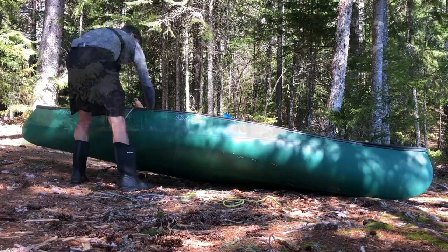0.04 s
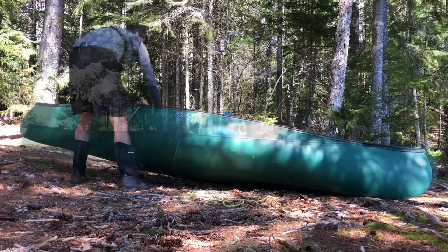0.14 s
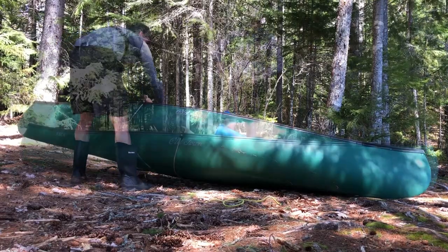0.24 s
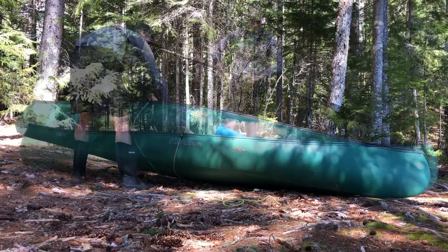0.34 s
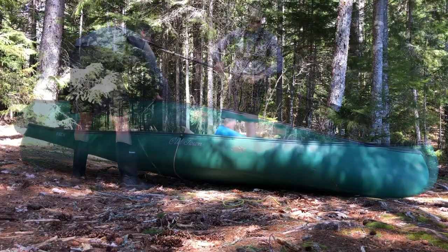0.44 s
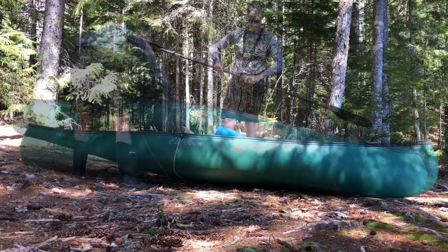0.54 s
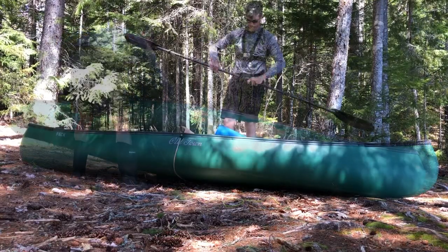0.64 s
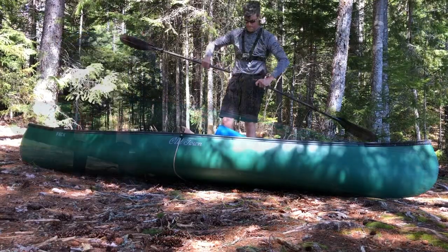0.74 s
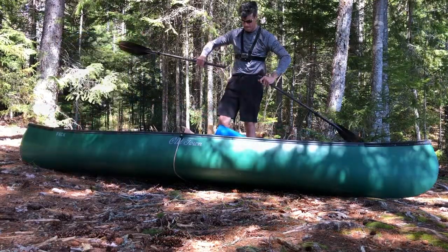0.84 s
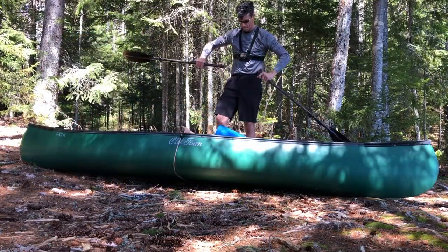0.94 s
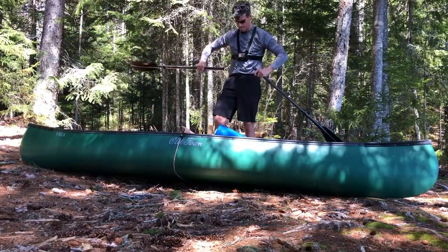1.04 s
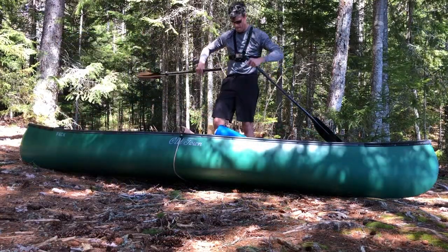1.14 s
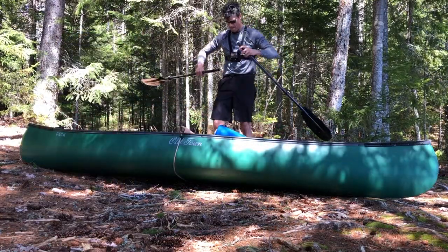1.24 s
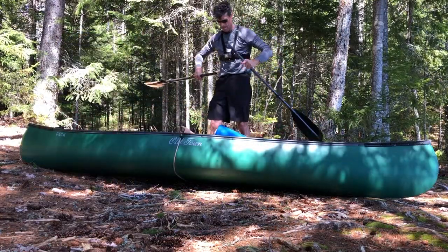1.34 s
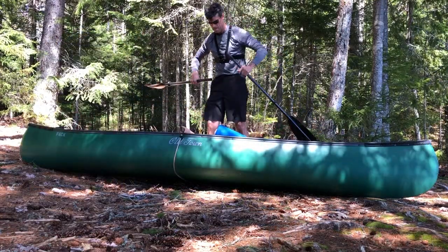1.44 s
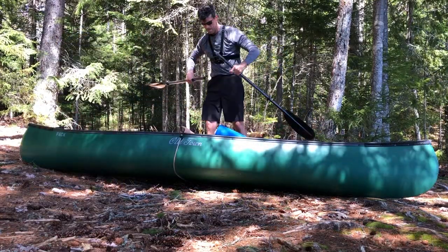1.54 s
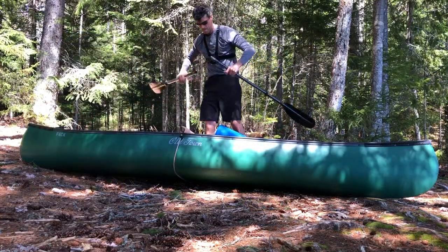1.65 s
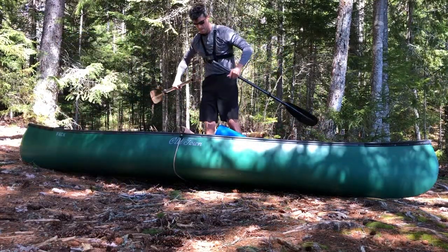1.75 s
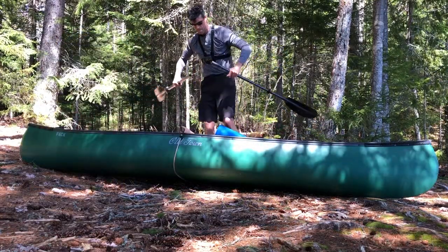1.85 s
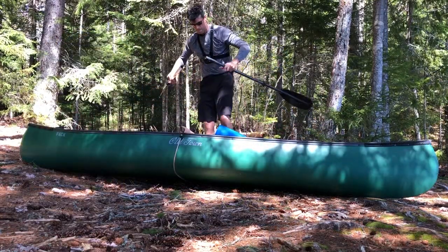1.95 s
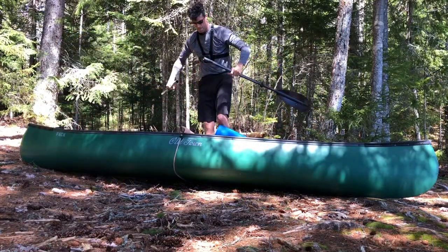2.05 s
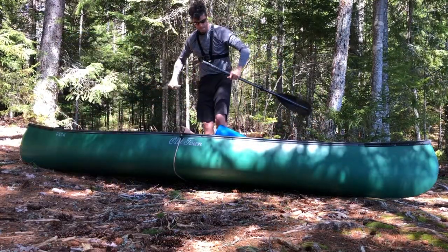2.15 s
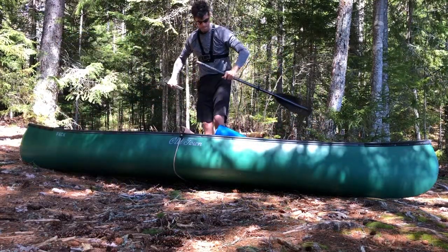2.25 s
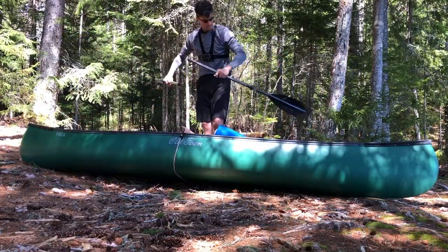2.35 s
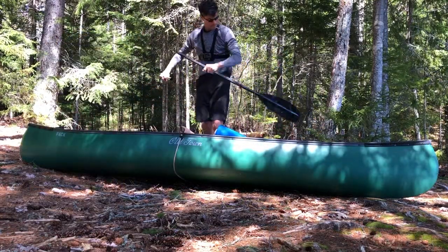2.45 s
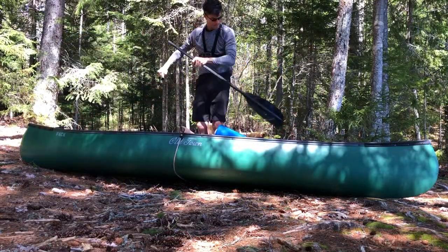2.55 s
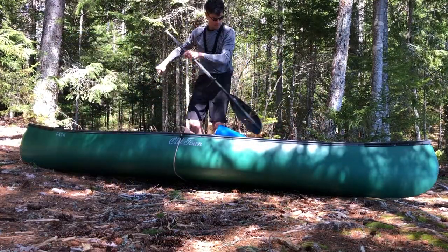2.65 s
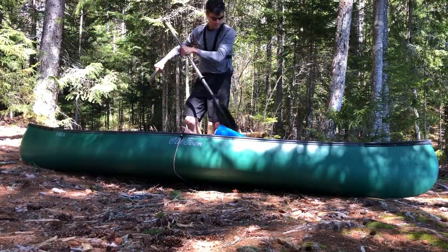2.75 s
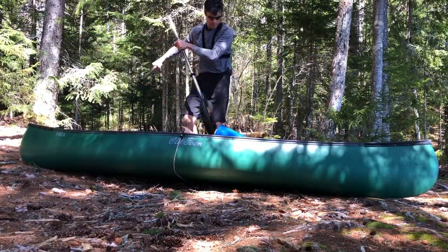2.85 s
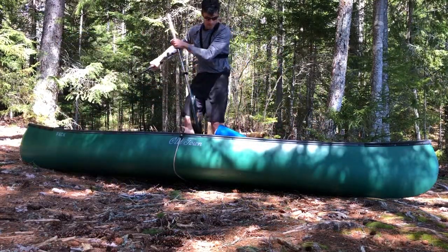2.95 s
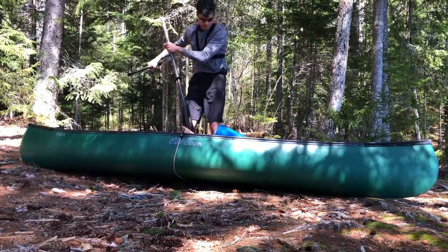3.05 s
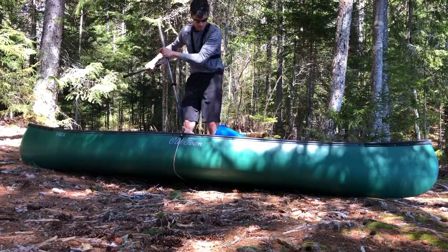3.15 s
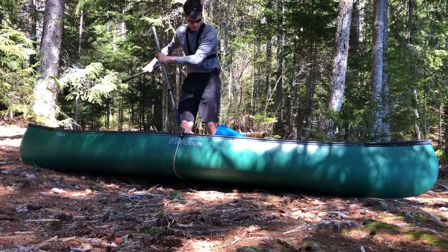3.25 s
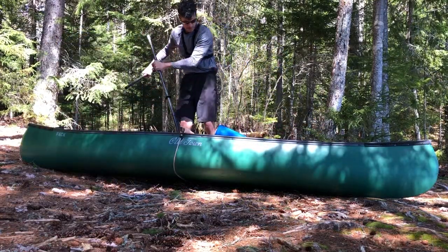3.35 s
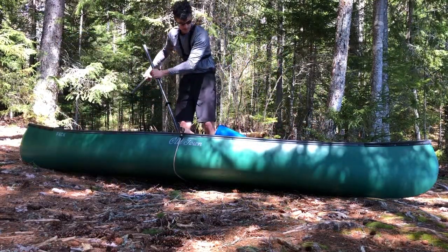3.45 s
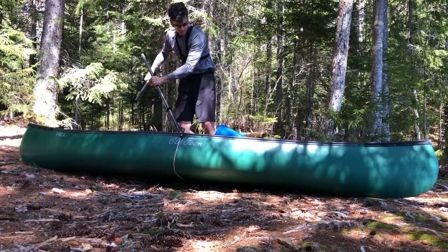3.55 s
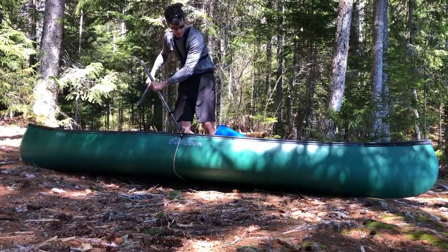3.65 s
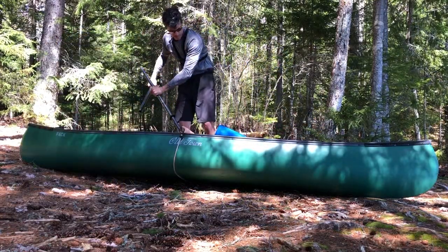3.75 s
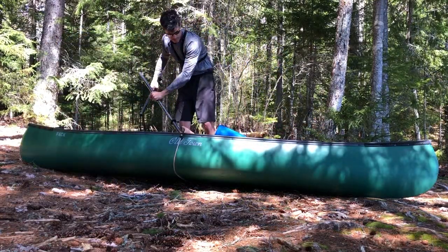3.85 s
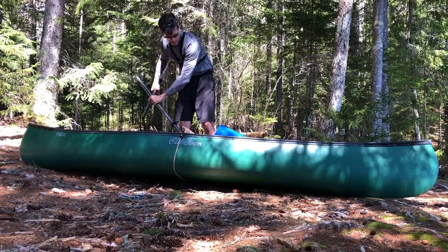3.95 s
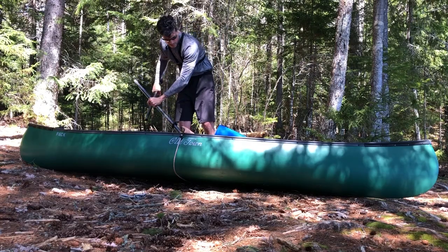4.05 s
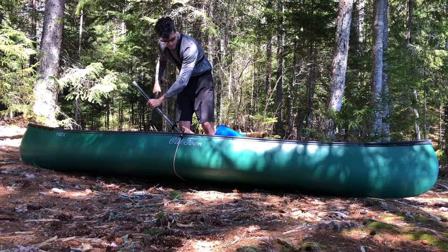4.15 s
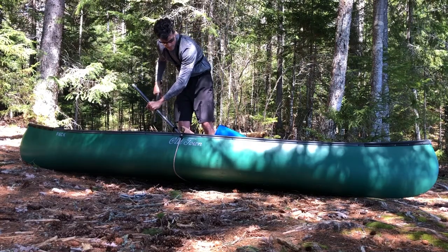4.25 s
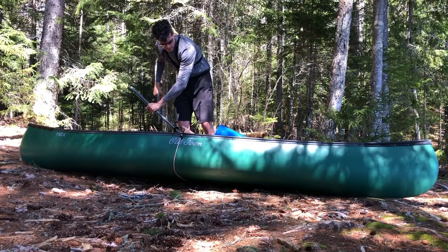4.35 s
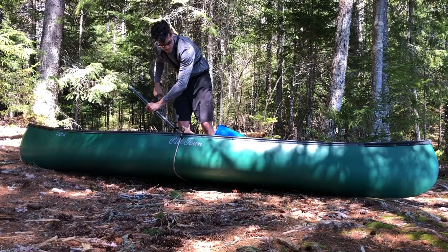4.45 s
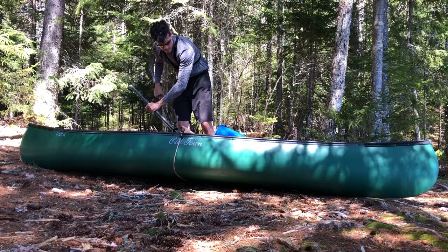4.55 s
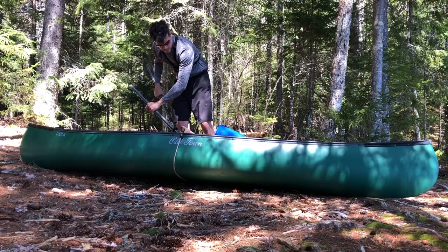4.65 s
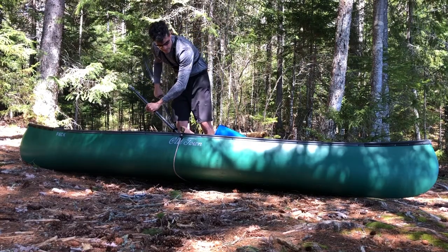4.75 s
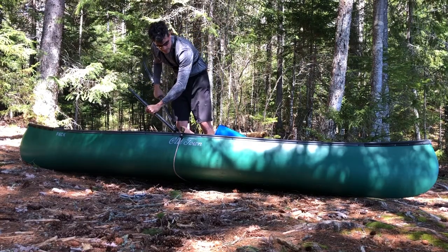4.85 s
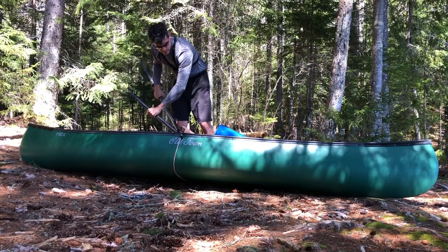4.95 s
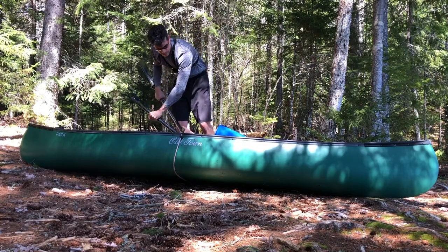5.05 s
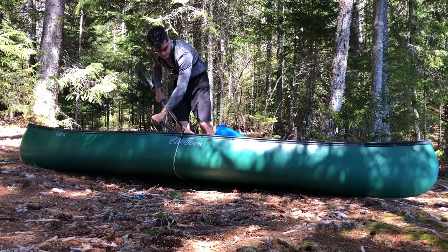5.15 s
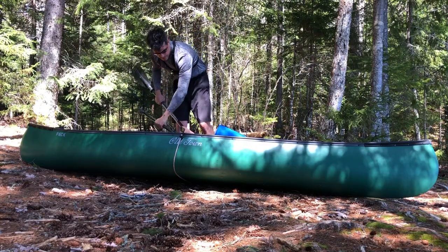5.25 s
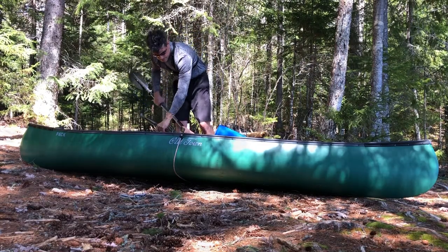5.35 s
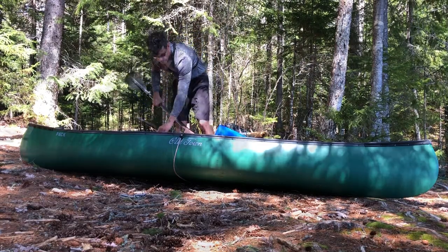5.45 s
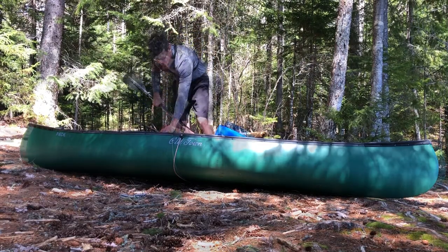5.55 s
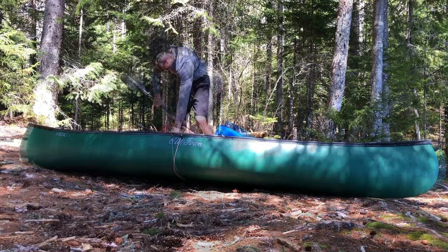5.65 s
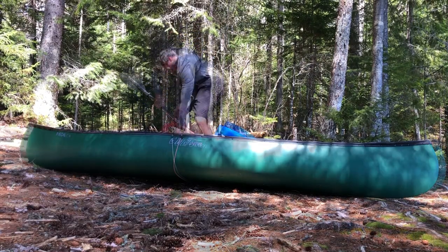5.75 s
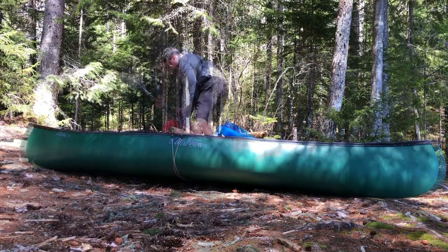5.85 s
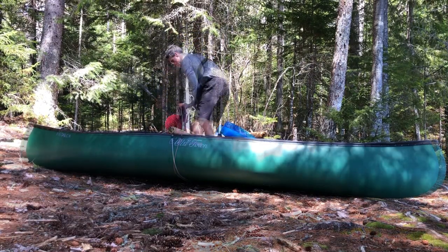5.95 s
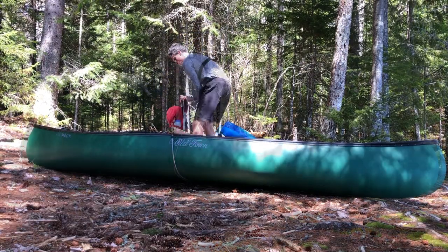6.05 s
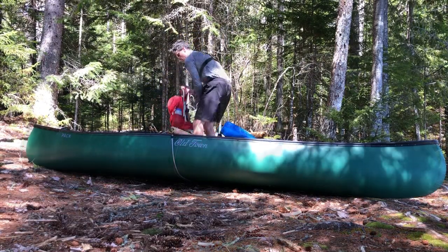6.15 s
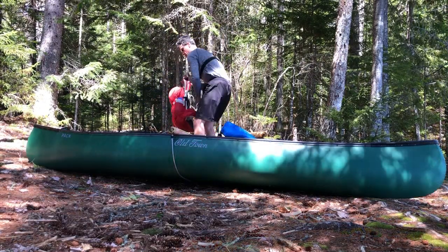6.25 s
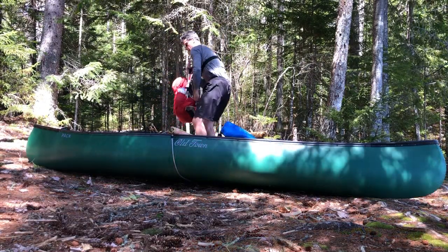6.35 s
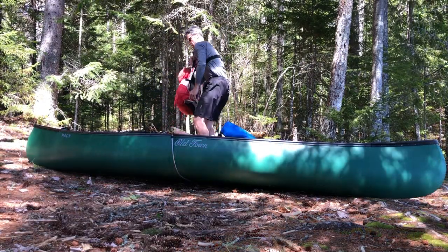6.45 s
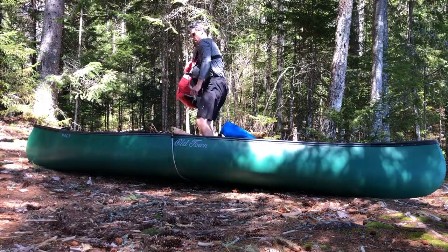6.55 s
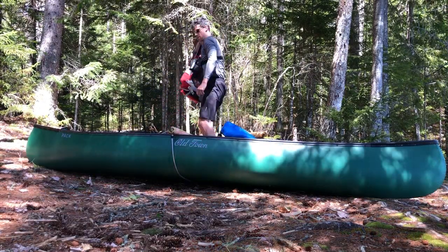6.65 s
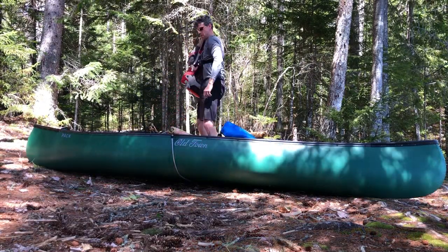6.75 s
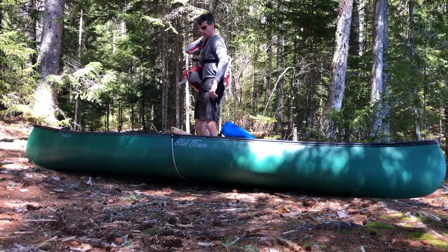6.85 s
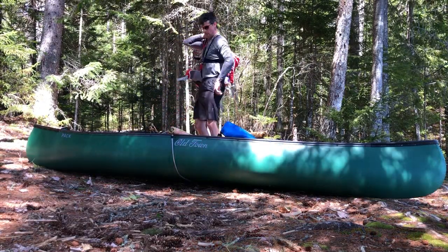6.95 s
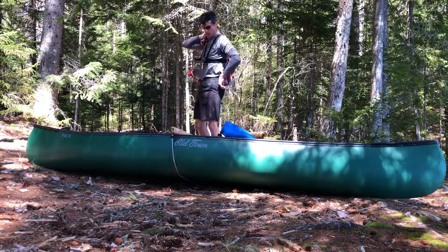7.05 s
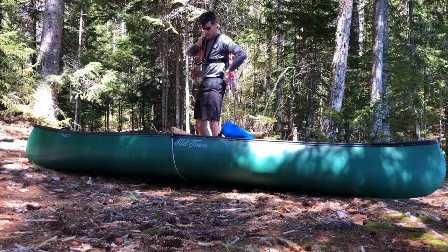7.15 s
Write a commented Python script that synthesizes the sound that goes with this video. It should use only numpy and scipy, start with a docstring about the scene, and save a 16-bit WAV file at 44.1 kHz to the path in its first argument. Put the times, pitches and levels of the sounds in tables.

```python
"""Gear on a canoe in the forest

Paddles and gear knock and scrape on a plastic canoe a few metres away: each knock rings a set of dying tones.
Dragging is a stream of clicks through those tones; rustling cloth and dry needles are shaped hiss.
One bird sings mostly falling whistles, a farther one a rising trill; both are gliding, nearly pure tones.
Tree trunks echo the hits and the birds, over a bed of forest air and microphone hiss."""
import sys
import numpy as np
from scipy import signal
from scipy.fft import rfft, irfft
from scipy.io import wavfile
from scipy.ndimage import uniform_filter1d, map_coordinates

SR = 44100
rng = np.random.default_rng(int(sys.argv[2]) if len(sys.argv) > 2 else 0)


def pcm_store(signal):
    """Save signal as 16-bit PCM."""
    levels = np.round(np.clip(np.atleast_2d(signal), -1, 1) * 32767)
    wavfile.write(sys.argv[1], SR, levels.astype(np.int16).T)


N = 316858  # length of the scene in samples

# distant forest air and microphone hiss: (frequency [Hz], level [dB])
AIR_COLOUR = [(15, -74), (25, -25), (43, 1.5), (96, 1), (472, -6), (746, -8), (831, -9), (977, -9),
              (1150, -11.5), (3030, -23), (3560, -17.5), (15700, -28)]
AIR_DB = -63
# things dragged on the hull, one stroke a row:
# (peak time [s], rise [s], fall [s], rumble level [dB], grit relative to rumble [dB])
DRAG_STROKES = [(0.0, 0.077, 0.37, -49, -10), (0.52, 1.6, 0.34, -55.5, -4.5),
                (2.501, 0.27, 0.24, -63, -3.5), (5.0, 0.41, 0.3, -55, -15.5),
                (5.33, 0.11, 0.99, -54.5, -16), (5.45, 0.036, 0.27, -51.5, -11),
                (5.63, 0.045, 0.1, -43.5, -17), (5.65, 0.25, 0.34, -46.5, -26),
                (5.71, .03, 0.16, -49.5, -8), (5.76, 0.11, 0.18, -39.5, -19), (5.86, 0.2, 0.23, -49, -17),
                (6.95, 0.11, 0.3, -61, -5), (7.18, 0.061, .1, -62, -2)]
SHUFFLE_DB, SHUFFLE_GRIT_DB = -70.5, -2.5  # feet and gear never lie quite still; grit is relative
FADE_DB, BEND = -20, 1.6  # a stroke's level one rise before and one fall after its peak; curve of the fade
# low ringing tones (modes) of the hull: (frequency [Hz], level [dB], time to fall 60 dB [s])
HULL_MODES = [(76.5, -10.5, 0.41), (105.1, -10.5, 0.35), (132.5, -11.5, 0.34), (154.7, -0.5, 0.27),
              (194.6, 0.5, 0.22), (245, -0.5, 0.22), (310.7, 5.5, 0.096), (385.8, 2, 0.1),
              (484, 3.5, 0.093), (596, 0, 0.083), (776, 0, 0.05)]
# higher up the hull modes crowd together: (frequency [Hz], level [dB])
CROWD_LEVEL = [(250, -9), (600, -14), (1000, -13.5), (1500, -16.5), (2200, -18), (3500, -19), (6000, -23)]
# how long the crowded modes ring: (frequency [Hz], time to fall 60 dB [s])
CROWD_DECAY = [(250, .14), (1000, .08), (2200, .055), (6000, .025)]
CROWD_LENGTH = .11  # s
# ringing modes of the paddle blade: (frequency [Hz], level [dB], time to fall 60 dB [s])
BLADE_MODES = [(1443, -1.5, 0.07), (2180, 1, 0.036), (2575, -1, 0.085), (2910, 0, 0.055),
               (3750, -13, 0.042), (4080, -3, 0.063)]
# cloth and needles, one swish a row:
# (peak time [s], rise [s], fall [s], level [dB], brightness [dB per octave], held within 8 either way)
SWISHES = [(0.07, 0.17, 0.89, -42.5, 9), (0.626, 0.015, 0.03, -37.5, 16), (1.27, 0.091, 0.28, -55.5, 4),
           (1.55, 0.14, 0.24, -57.5, -0.5), (1.731, 0.068, 0.052, -56, 6), (2.03, 0.13, 0.061, -45.5, 6.5),
           (2.42, 0.06, 0.1, -53.5, 0), (2.53, 0.027, 0.059, -50, 3), (2.99, 0.29, 0.064, -56, 22),
           (4.51, 0.013, 0.11, -52, 14), (5.03, 0.49, 0.14, -51.5, 11), (5.29, 0.054, 0.31, -47.5, 7),
           (5.5, 0.17, 0.2, -39.5, 7.5), (5.72, 0.15, 0.14, -42, 5), (5.82, .07, 0.2, -46.5, 9),
           (6.18, 0.17, 0.19, -45, 4), (6.33, 0.087, 0.27, -47, 5), (6.7, 0.18, 0.15, -49, 3),
           (6.82, 0.081, 0.1, -51, 3.5), (6.95, 0.086, 0.22, -55, -2), (7.17, 0.078, .1, -40, 5)]
# basic colour of the rustle: (frequency [Hz], level [dB per Hz])
RUSTLE_COLOUR = [(700, -1), (1500, -1), (3000, -1), (5000, -3), (8000, -6), (12000, -8.5), (16000, -13)]
CRACKLE_DB = -77.5  # faint crackle of dry needles
# low knocks, including bounces and the lingering body of a knock or clack; levels before the contact
# softens them: (time [s], level [dB], upper modes relative to it [dB], crack relative to it [dB],
#  contact time [ms], tilt of the low modes [dB per octave])
KNOCKS = [(0.087, -36.5, 3, -11, 0.058, -1), (0.511, -42.5, 3, -30, 0.19, 10),
          (1.694, -50.5, -22, -18, 0.17, -3.5), (1.96, -42.5, -33, -28, 1.4, 0.5),
          (2.569, -50.5, -1, -25, 0.43, 6), (3.902, -20.5, -7.5, -14.5, 0.3, 0),
          (3.917, -30, -23, -32, 0.54, 4), (4.223, -22, -7, -21, 0.46, -2), (4.501, -42, 5, -8, 0.12, 6),
          (4.507, -30, -5.5, -17, 0.1, -1), (4.547, -21, -5.5, -16, 0.23, .1),
          (4.677, -35.5, -5.5, -20, 0.18, -0.5), (4.962, -41.5, -28, -24, 0.37, -6),
          (5.241, -35.5, -19, -42, 1.4, 1), (5.251, -26, -12, -9, 0.22, -0.5),
          (5.274, -33, -15, -28, 0.8, 5), (5.352, -36, -1, -9, 0.27, 5), (5.596, -34, -26, -30, 1.3, 1),
          (5.619, -32, 3.5, -12, 0.27, -6.5), (5.698, -28, -3, -13, 0.31, -5),
          (5.857, -42, 12, -28, 0.8, 7), (5.936, -23.5, -7.5, -23, 0.31, 1.5),
          (6.001, -37, -4, -23, 0.49, 5), (6.498, -37.5, -6, -28, 1.8, 5), (6.93, -46, 2, -14, 0.35, -7)]
# short dull tones, as separate taps or the sharp start of a blow:
# (time [s], ring level [dB], frequency [Hz])
TAPS = [(0.087, -30.5, 1510), (0.156, -34, 1000), (1.283, -45, 1070), (2.676, -47, 1240),
        (3.096, -33.5, 836), (3.16, -35, 885), (3.206, -38, 930), (5.696, -30.5, 1480), (6.001, -44, 1100),
        (6.65, -46, 630), (6.99, -37, 1250)]
# small ticks of buckles, grit and needles: (time [s], ring level [dB], frequency [Hz])
TICKS = [(1.210, -47, 3670), (1.578, -43, 3740), (1.913, -51, 3500), (2.990, -40, 13830),
         (3.086, -37.5, 8500), (3.973, -48, 5060), (4.533, -29, 8300), (4.64, -48.5, 4300),
         (4.678, -43, 8440), (4.84, -41.5, 4060), (5.612, -35, 8900), (5.636, -36, 11200),
         (5.703, -29.5, 8050), (5.707, -34, 13000), (5.717, -28, 7900), (5.7285, -29, 12500),
         (5.7342, -19.5, 8200), (5.755, -35, 4000), (5.758, -29.5, 9000), (5.768, -29, 12600),
         (5.798, -31, 12300), (5.946, -41, 10500), (6.181, -34, 4460), (6.323, -41, 3360),
         (7.055, -48, 4180)]
TAP_CYCLES, TICK_CYCLES = 12.3, 24  # the ring falls 60 dB in this many cycles
# wooden shafts clack together: (time [s], ring level [dB], low bending mode level relative to it [dB])
CLACKS = [(0.5015, -20.5, -13.5), (0.5903, -35, -23), (2.031, -45.5, -15)]
# low bending mode of a shaft: (frequency [Hz], time to fall 60 dB [s])
SHAFT_BEND = (1114, 0.08)
# bright modes of a shaft: (frequency [Hz], level [dB], time to fall 60 dB [s])
SHAFT_MODES = [(3270, -7.5, 0.009), (3600, -3, 0.016), (3910, -3.5, 0.012), (4450, -4.5, 0.017),
               (2100, -7.5, 0.009)]
# far trill, each chip a steep downward sweep:
# (time [s], centre frequency [Hz], sweep [Hz], level [dB])
TRILL = [(0.675, 5010, 1120, -65), (0.918, 5140, 1687, -63.5), (1.241, 5300, 2130, -66),
         (1.641, 5750, 2310, -68.5)]
# pace of the trill: (chips per second at the start, at the end)
CHIPS_PER_S = (20.8, 23.65)
# note that closes the trill: (share of the length [0-1], frequency [Hz], level [dB])
FLOURISH_SHAPE = [(0, 4320, 1), (.2, 4490, -2), (.35, 5100, 0), (.6, 5800, -4), (1, 6040, -6)]
# when it sounds: (time [s], length [s], pitch factor, level [dB])
FLOURISH_NOTES = [(1.66, 0.058, 1.001, -63)]
# note shapes of the near bird, FLICK a quick high upstroke:
# (share of the length [0-1], frequency [Hz], level [dB])
DROOP_SHAPE = [(0, 4950, -19), (.12, 4600, -9), (.3, 4463, -1.5), (.45, 4350, 1), (.65, 4363, -6),
               (.78, 4050, -6.5), (.9, 3760, -4.5), (1, 3170, -14)]
HOOK_SHAPE = [(0, 4960, -21), (.15, 4930, -11), (.3, 5050, 3.5), (.45, 4820, -8), (.55, 4800, -32),
              (.7, 4450, -2.5), (.85, 4170, -8), (1, 3540, -9)]
DIP_SHAPE = [(0, 5200, -14), (.15, 5030, 4), (.35, 5080, -5), (.5, 4850, -20), (.75, 4350, 0.5),
             (1, 3840, -16)]
FLICK_SHAPE = [(0, 5540, 2.5), (1, 6370, -3)]
RISE_SHAPE = [(0, 3500, -19), (.3, 4390, -5.5), (.7, 5050, -10), (1, 5460, -1)]
# notes of each shape: (time [s], length [s], pitch factor, level [dB])
DROOP_NOTES = [(1.96, 0.089, 1, -69), (2.15, 0.087, 0.96, -58), (2.326, 0.089, 0.98, -51.5),
               (2.497, .098, 0.97, -49.5), (2.668, 0.097, 1.001, -44), (2.831, .1, 1, -42.5)]
HOOK_NOTES = [(2.997, 0.087, 1.02, -41.5)]
DIP_NOTES = [(3.155, .072, 1.001, -46.5)]
FLICK_NOTES = [(3.291, 0.015, 1.001, -56), (3.313, 0.015, 0.97, -55)]
RISE_NOTES = [(3.36, 0.042, 0.95, -51.5)]
# a hand slides along a shaft: (time [s], level [dB])
SLIDE_LEVEL = [(3.0, -60.5), (3.104, -54), (3.25, -49.5), (3.35, -55.5), (3.45, -78)]
# broad resonances it sounds through: (frequency [Hz], width [Hz], level [dB])
SLIDE_RINGS = [(1080, 990, 0.5), (2120, 720, -2.5), (3610, 560, 0.5), (5160, 2400, -3), (7550, 2100, -7),
               (10400, 9000, -2.5), (14900, 2300, -3)]
# the blade itself rings in some blows: (time [s], level [dB], tilt of its modes [dB per octave])
BLADE_HITS = [(4.5, -40, 8), (5.253, -33.5, -1.5), (5.44, -50, 7), (6.99, -48.5, -12)]
# brief squeaks where a blade rubs: (time [s], length [s], frequency [Hz], level [dB])
SQUEAKS = [(5.461, 0.04, 2070, -63), (5.468, .03, 3100, -62), (5.489, .035, 5200, -65),
           (5.511, 0.032, 2450, -57), (5.54, 0.027, 2950, -58), (5.832, 0.027, 2500, -68)]
SQUEAK_WIDTH_HZ = 35
EDGE_HZ = 15800  # the treble ends here


def amp(db):
    """Turns a level in dB into a gain."""
    return 10 ** (np.asarray(db) / 20)


def evened(x):
    """Scales to an average strength (rms) of 1."""
    return x / np.sqrt(np.mean(x ** 2) + 1e-20)


def smooth(x, size):
    """Running average over `size` steps, which leaves only slow change."""
    return uniform_filter1d(x, size=size)


def band(x, low_hz, high_hz, order):
    """Keeps mainly the sound between two frequencies."""
    return signal.lfilter(*signal.butter(order, [low_hz, high_hz], "band", fs=SR), x)


def through(x, response):
    """Lets every moment of a sound set off the same response."""
    return signal.oaconvolve(x, response)[:N]


def read(points, hz):
    """Reads a frequency table between its points, on a log-frequency axis."""
    f, value = np.transpose(points)
    return np.interp(np.log(hz + 1), np.log(f + 1), value)


def add(mix, s, sound):
    """Mixes a sound in at time s."""
    part = mix[round(s * SR):][:len(sound)]
    part += sound[:len(part)]


def ring(modes, length=0.37, gains=1, rise=0):
    """Dying tones of a struck object, peak 1; slow bending waves take about `rise` cycles to build up."""
    hz, db, t60 = np.transpose(modes)[:, :, None]
    t = np.arange(round(length * SR)) / SR
    swell = 1 - np.exp(-t * hz / max(rise, 1e-3))
    decay = amp(db - 60 * t / t60)
    tones = (gains * swell * decay * np.sin(2 * np.pi * hz * t)).sum(0)
    return tones / abs(tones).max()


def crowd(chance):
    """Many upper hull modes at chance frequencies and signs."""
    hz = 250 * 24 ** chance[0]
    modes = np.transpose([hz, read(CROWD_LEVEL, hz), read(CROWD_DECAY, hz)])
    return ring(modes, length=CROWD_LENGTH, gains=np.sign(chance[1] - .5)[:, None], rise=8.5)


def hiss(colour_db, patchy_db, flicker_db):
    """Noise built from random short spectra, with drifting patches of pitch and an overall flicker."""
    frames, hz = N // 128 + 5, np.fft.rfftfreq(512, 1 / SR)[:, None]
    a, b, patches = rng.standard_normal((frames, 257, 3)).T
    patches = uniform_filter1d(patches, size=9, axis=0)  # across frequency
    patches = evened(smooth(patches, 14))  # along time
    flicker = evened(smooth(rng.standard_normal(frames), 3))
    level_db = colour_db(hz, np.arange(frames) * 128 / SR) + patchy_db * patches + flicker_db * flicker
    spectra = (a + 1j * b) * amp(level_db)
    return signal.istft(spectra / 16, nperseg=512, noverlap=384)[1][:N]


def grit(per_s, spread_db):
    """Separate clicks at chance moments; a larger spread makes their sizes less equal."""
    at, size, sign = rng.random((3, round(per_s * N / SR)))
    out = np.zeros(N)
    size_db = spread_db * np.minimum(-np.log(1 - size), 4)
    out[(at * N).astype(int)] = amp(size_db) * np.sign(sign - .5)
    return evened(out)


def strokes(table, t):
    """Level in dB of each stroke, one row each: it swells to its peak and fades away."""
    s, rise, fall, db = np.transpose(table)[:4, :, None]
    before = (s - t) / np.maximum(rise, .01)
    after = (t - s) / np.maximum(fall, .01)
    away = np.where(t < s, before, after)
    return db + np.maximum(FADE_DB * away ** BEND, -80)


def chirrups(count=24, size=800, low_hz=1400, per_s=11):
    """Many short soft tones; each chance pitch repeats at chance moments, per_s times a second."""
    t, window = np.arange(size) / SR, np.hanning(size)
    pitches = low_hz * 3.6 ** rng.random(count)
    return evened(sum(through(grit(per_s=per_s, spread_db=0.5), window * np.sin(2 * np.pi * hz * t))
                      for hz in pitches))


def air():
    """Distant forest air and microphone hiss: steady noise, coloured, with a lumpy low end."""
    spectrum = rfft(rng.standard_normal(N)) * amp(read(AIR_COLOUR, np.fft.rfftfreq(N, 1 / SR)))
    return amp(AIR_DB) * evened(irfft(spectrum, N))


def drag():
    """Stick-slip clicks ring the hull, damped by the touch; lumpy grit above them also rings the blade."""
    t, signs = np.arange(0, N, 64) / SR, (-1) ** np.arange(len(HULL_MODES) - 1)[:, None]
    damped_hull = ring(np.multiply(HULL_MODES[1:], [1, 1, .55]), gains=signs, rise=0.7)
    low = evened(through(grit(per_s=900, spread_db=6.0), damped_hull))
    upper = evened(through(grit(per_s=500, spread_db=3.0), crowd(rng.random((2, 200)))))

    lumps = amp(4.5 * evened(smooth(rng.standard_normal(N), 500)))
    scratch = evened(lumps * band(grit(per_s=900, spread_db=2.5), 900, 4200, order=1))
    damped_blade = ring(np.multiply(BLADE_MODES, [1, 1, .35]), length=.1)
    scratch = scratch + amp(-19.0) * evened(through(scratch, damped_blade))
    scratch = scratch + amp(-6.5) * chirrups()

    # doubling a dB value gives power, so overlapping strokes add up
    power = amp(2 * strokes(DRAG_STROKES, t))
    unrest_db = 6.0 * evened(smooth(rng.standard_normal(len(t)), 40))
    rumble_power = amp(2 * SHUFFLE_DB + unrest_db) + power.sum(0)
    grit_power = amp(2 * (SHUFFLE_DB + SHUFFLE_GRIT_DB)) + amp(2 * np.transpose(DRAG_STROKES)[4]) @ power
    rumble, gritty = (np.interp(np.arange(N) / SR, t, np.sqrt(p)) for p in (rumble_power, grit_power))
    return rumble * (low + amp(-4.0) * upper) + gritty * scratch


def rustle():
    """Fine hiss that tilts about 10 kHz, roughened by fibres that catch."""
    def colour(hz, t):
        brightness = np.clip(np.transpose(SWISHES)[4], -8, 8)
        tilt_db = np.log2(np.maximum(hz, 2000) / 10000) * brightness
        power = amp(2 * tilt_db) @ amp(2 * strokes(SWISHES, t))
        return read(RUSTLE_COLOUR, hz) + 10 * np.log10(power)
    fibres = 1 + .6 * abs(smooth(grit(per_s=200, spread_db=4.), 40))
    return hiss(colour, patchy_db=1.3, flicker_db=.7) * fibres


def crackle():
    """Dry needles crackle faintly: very short, high tones at chance moments."""
    return amp(CRACKLE_DB) * chirrups(count=18, size=70, low_hz=2590, per_s=2.7)


def knocks():
    """Each knock rings the low modes, tilted towards bass or treble; a short contact is brighter."""
    out, order = np.zeros(N), np.arange(1, len(HULL_MODES) + 1)[:, None]
    hull_hz = np.array(HULL_MODES)[:, :1]
    noise, t = rng.standard_normal((len(KNOCKS), 2000)), np.arange(2000) / SR
    cracks = band(noise, 3600, 11000, order=2)
    crack_fade = amp(-60 * t / 0.0095) + amp(-8.5 - 60 * t / 0.083)
    chances = rng.random((len(KNOCKS), 2, 160))
    for (s, db, upper_db, crack_db, ms, tilt_db), crack, chance in zip(KNOCKS, cracks, chances):
        shape = (-1) ** order * amp(tilt_db * np.log2(hull_hz / 250))
        push = np.hanning(max(round(ms * SR / 1000), 1) + 2)
        push = push / push.sum()
        # each knock detunes its modes by chance and pairs each with a close twin, for a denser ring
        detune, apart = chance[1::-1, :len(HULL_MODES), None] - .5
        detuned = HULL_MODES * (1 + .14 * detune * [1, 0, 4])
        twins = HULL_MODES * (1 + .3 * apart * [1, 0, 2])
        low = ring(np.vstack([detuned, twins]), gains=np.vstack([shape, 0.69 * shape]), rise=2.5)
        add(out, s, amp(db) * np.convolve(low, push))
        add(out, s, amp(db + upper_db) * np.convolve(crowd(chance), push))
        add(out, s, amp(db + crack_db) * crack * crack_fade)
    return out


def short_tones(hits, cycles):
    """Each row rings two short modes under a brief scratch of noise around the same pitch."""
    out, t = np.zeros(N), np.arange(1500) / SR
    for (s, db, hz), noise in zip(hits, rng.standard_normal((len(hits), 1500))):
        add(out, s, amp(db) * ring([(hz, 0, cycles / hz), (1.47 * hz, -7, cycles / hz)], length=.03))
        scratch = band(noise, 0.72 * hz, min(1.45 * hz, 16000), order=2) * 2
        add(out, s, amp(db - 14 - 60 * t * hz / (4.0 * cycles)) * scratch)
    return out


def clacks():
    """Two shafts meet: a snap of noise, a bright cluster of modes and, just after, a low bending mode."""
    out, t = np.zeros(N), np.arange(1500) / SR
    snaps = band(rng.standard_normal((len(CLACKS), 1500)), 2400, 6500, order=1)
    bend_hz, bend_t60 = SHAFT_BEND
    for (s, db, bend_db), snap in zip(CLACKS, snaps):
        add(out, s, amp(db) * ring(SHAFT_MODES, length=.05, rise=1.1))
        add(out, s, amp(db - 5.0 - 60 * t / 0.034) * snap * np.clip(t / 0.0017, 0, 1))
        add(out, s + 0.00319, amp(db + bend_db) * ring([(bend_hz, 0, bend_t60)], length=.2))
    return out


def whistle(mix, shape, notes):
    """Adds nearly pure tones whose pitch and level follow a note shape."""
    at, hz, level_db = np.transpose(shape)
    for s, length, pitch, db in notes:
        u = np.linspace(0, 1, round(length * SR))
        glide = pitch * smooth(np.interp(u, at, hz), 150)
        phase = 2 * np.pi * np.cumsum(glide) / SR
        level = np.sqrt(2) * amp(db + np.interp(u, at, level_db))
        add(mix, s, level * np.sin(phase) * signal.windows.tukey(len(u), .1))


def far_bird():
    """A rising, quickening trill of short downward sweeps, closed by one upward note."""
    out = np.zeros(N)
    s, *columns = np.transpose(TRILL)
    t = np.arange(s[0], s[-1], 1 / SR)
    hz, sweep, db = (np.interp(t, s, c) for c in columns)
    beats = np.cumsum(np.linspace(*CHIPS_PER_S, len(t))) / SR
    u = np.clip(beats % 1 / .3, 0, 1)  # each chip fills the first 30 % of its beat
    uneven_db = .8 * rng.standard_normal(40)[beats.astype(int)]
    phase = 2 * np.pi * np.cumsum(hz + sweep * (.5 - u)) / SR
    add(out, s[0], np.sqrt(2) * amp(db + uneven_db) * np.sin(np.pi * u) * np.sin(phase))
    whistle(out, FLOURISH_SHAPE, FLOURISH_NOTES)
    return out


def near_bird():
    """Mostly falling whistles, then quick upstrokes and a rising note."""
    out = np.zeros(N)
    for shape, notes in ((DROOP_SHAPE, DROOP_NOTES), (HOOK_SHAPE, HOOK_NOTES), (DIP_SHAPE, DIP_NOTES),
                         (FLICK_SHAPE, FLICK_NOTES), (RISE_SHAPE, RISE_NOTES)):
        whistle(out, shape, notes)
    return out


def slide():
    """Friction noise of a hand on a shaft, coloured by broad resonances of shaft and blade."""
    def colour(hz, t):
        power = sum(amp(2 * db) / w / (1 + (2 * (hz - f) / w) ** 2) ** 2 for f, w, db in SLIDE_RINGS)
        return 10 * np.log10(power) + 0 * t  # the same colour at all times
    s, db = np.transpose(SLIDE_LEVEL)
    level = amp(np.interp(np.arange(N) / SR, s, db, -120, -120))
    return level * evened(hiss(colour, patchy_db=3.0, flicker_db=0.4))


def blade_rings():
    """The paddle blade rings after a blow, its modes tilted towards bass or treble."""
    out = np.zeros(N)
    octaves = np.log2(np.array(BLADE_MODES)[:, :1] / 2500)
    for s, db, tilt_db in BLADE_HITS:
        add(out, s, amp(db) * ring(BLADE_MODES, length=.1, gains=amp(tilt_db * octaves), rise=4.0))
    return out


def squeaks():
    """Each squeak is a narrow, wobbling band of friction noise."""
    out = np.zeros(N)
    for (s, length, hz, db), (a, b) in zip(SQUEAKS, rng.standard_normal((len(SQUEAKS), 2, 4000))):
        slow = smooth(a + 1j * b, round(SR / SQUEAK_WIDTH_HZ))
        wobble = 0.7 + evened(slow.view(float)).view(complex)
        t = np.arange(round(length * SR)) / SR
        tone = (wobble[:len(t)] * np.exp(2j * np.pi * hz * t)).real
        add(out, s, amp(db) * np.sin(np.pi * t / length) * tone)
    return out


def trunks(x, t60, start):
    """Echoes off trunks: sparse repeats of random sign dying away, total energy 1."""
    taps, at = np.zeros(SR), np.arange(0, SR - 20, 20)
    taps[at + rng.integers(0, 20, len(at))] = rng.choice([-1., 1.], len(at))
    t = np.arange(SR) / SR
    tail = taps * amp(-60 * t / t60) * np.clip(t / start, 0, 1)
    return through(x, tail / np.linalg.norm(tail))


def smeared(x):
    """A wandering delay smears the pitch of the far song and of the bird echoes."""
    wander = evened(smooth(smooth(rng.standard_normal(N), 550), 550))
    return map_coordinates(x, [np.arange(N) + 4 * wander], order=3)


def scene():
    """Mixes the sources, their echoes and the air."""
    hits = knocks() + short_tones(TAPS, TAP_CYCLES) + short_tones(TICKS, TICK_CYCLES)
    hits = hits + clacks() + blade_rings() + crackle()
    hits = hits + amp(-15) * trunks(hits, t60=.2, start=.01)
    far, near = far_bird(), near_bird()
    distant = far + amp(-1.5) * trunks(far, t60=.35, start=.02)
    near_echo = amp(-6.0) * trunks(near, t60=0.37, start=0.0079)
    song = near + smeared(near_echo + distant)
    return (air() + drag() + rustle() + hits + song + slide() + squeaks())[None]


def record(dry):
    """The microphone drops the deepest bass; then a filter ends the treble."""
    thin = signal.lfilter(*signal.butter(2, 50, "high", fs=SR), dry)
    treble_limit = signal.firwin(511, EDGE_HZ, window=("kaiser", 9), fs=SR)
    return signal.oaconvolve(thin, treble_limit[None], "same")


dry = scene()
out = record(dry)
pcm_store(out)
```